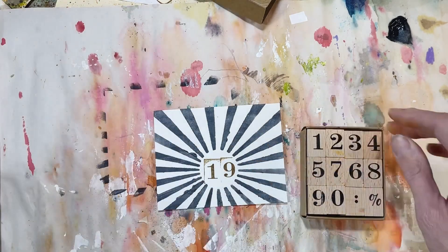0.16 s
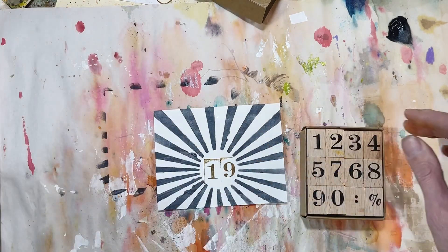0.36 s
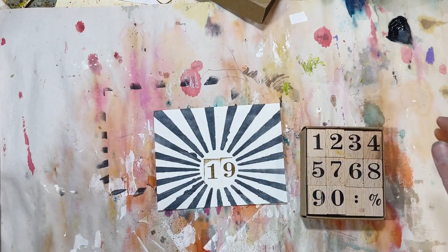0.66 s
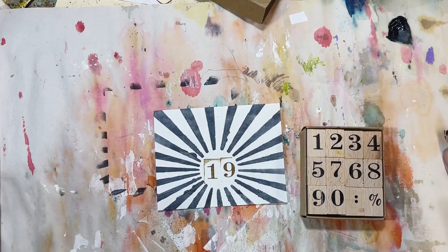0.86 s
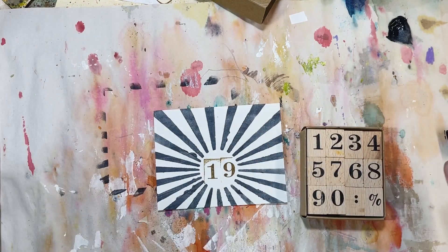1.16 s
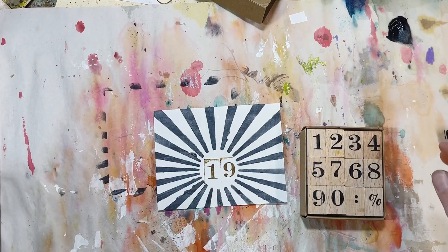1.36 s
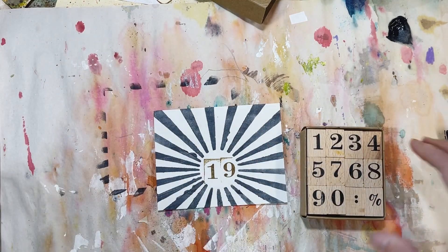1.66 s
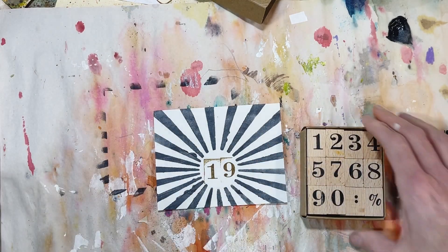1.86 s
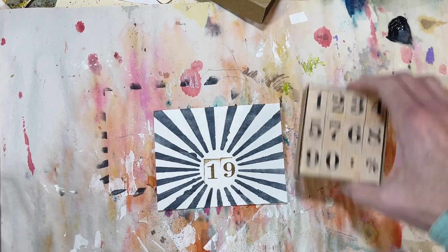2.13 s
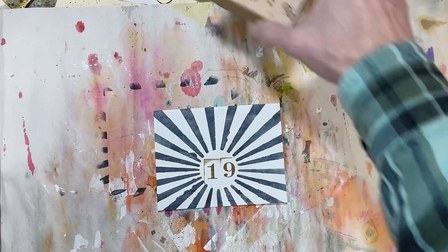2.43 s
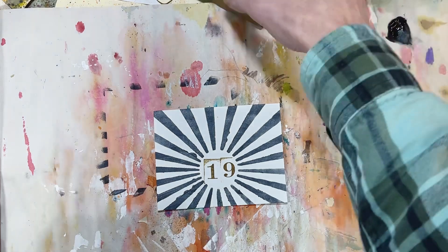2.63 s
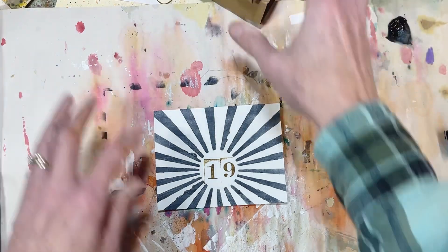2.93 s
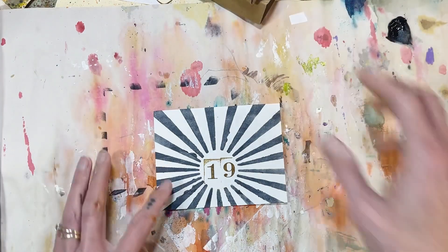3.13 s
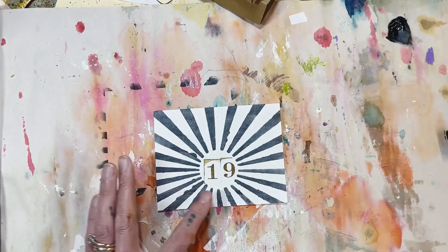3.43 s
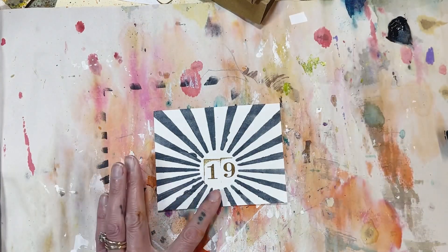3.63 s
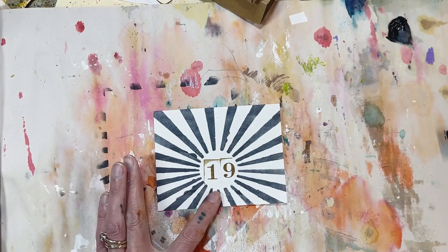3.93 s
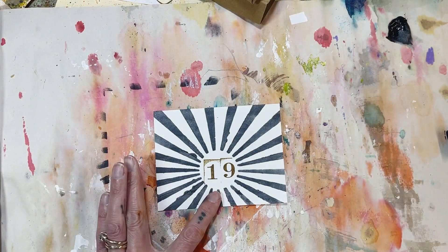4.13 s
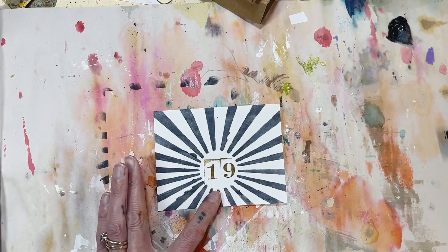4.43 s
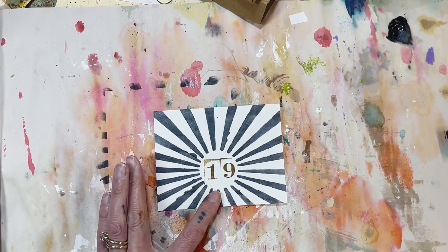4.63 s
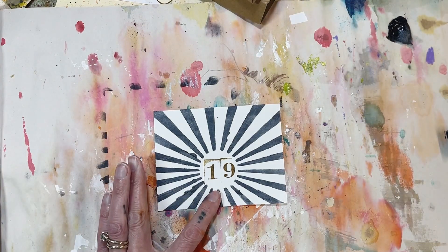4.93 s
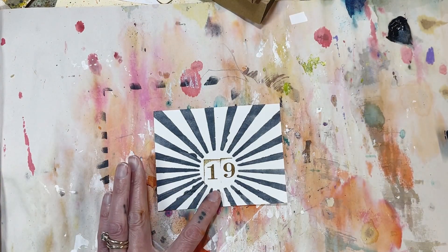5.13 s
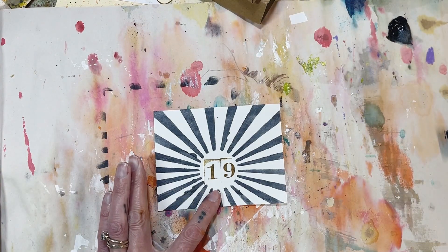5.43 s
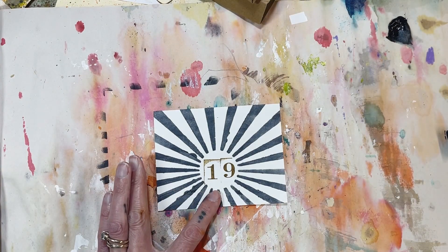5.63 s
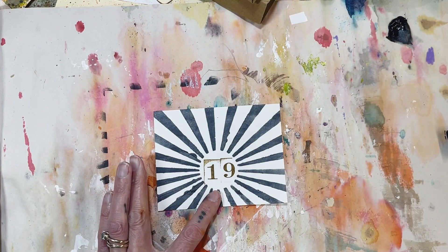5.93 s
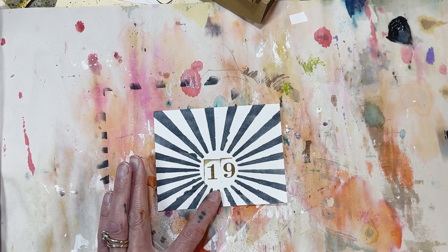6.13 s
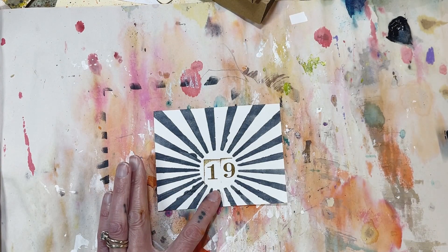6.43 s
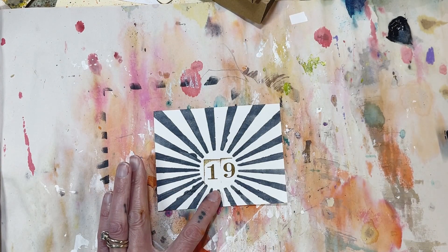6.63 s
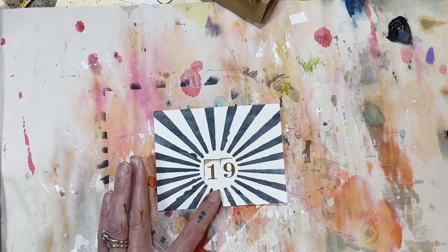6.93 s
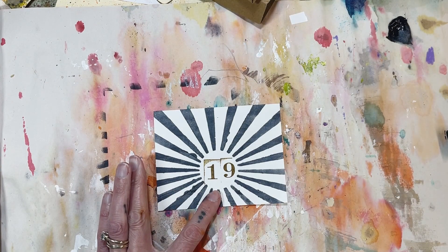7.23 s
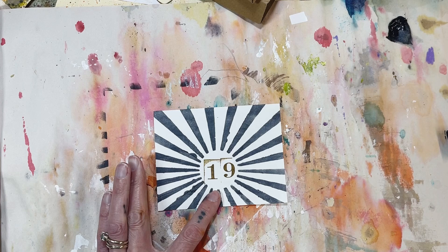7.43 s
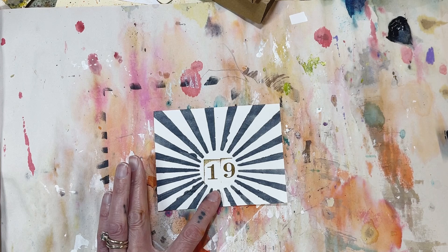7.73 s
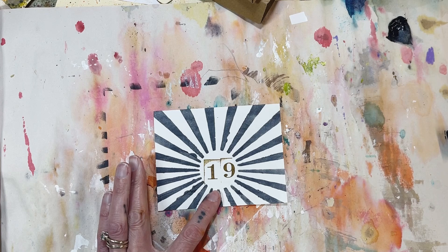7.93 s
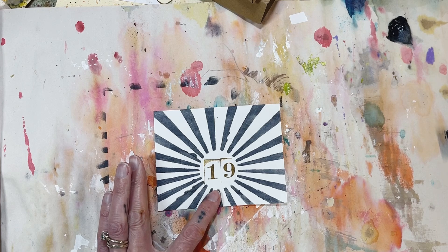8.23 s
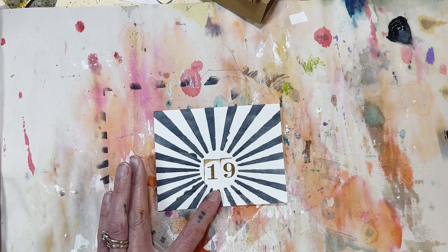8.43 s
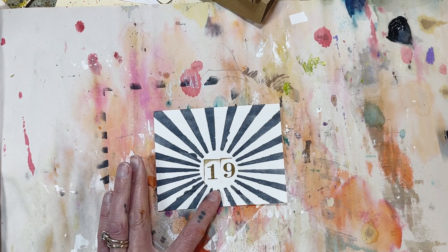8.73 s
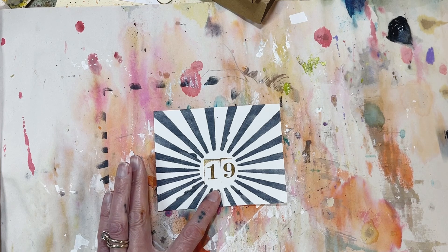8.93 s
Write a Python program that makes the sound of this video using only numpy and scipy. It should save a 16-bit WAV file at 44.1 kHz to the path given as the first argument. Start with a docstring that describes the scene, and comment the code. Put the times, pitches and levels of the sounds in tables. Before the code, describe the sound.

A fast clockwork-like ticking runs steadily in a quiet small room while wooden stamp blocks knock, scrape and click on a tabletop.

```python
"""Rubber stamps and a ticking mechanism

A box of wooden rubber stamps is lifted off a work table and set down; a hand then picks through the blocks.
Rough bursts of force ring wood, card edges and tabletop; trains of tiny slips make the dragging sounds.
A small clockwork-like mechanism ticks about 17 times a second, its pace wandering, in a quiet room.
"""
import sys
import numpy as np
from scipy import signal
from scipy.fft import rfft, irfft, next_fast_len
from scipy.io import wavfile
from scipy.ndimage import uniform_filter1d

SR = 44100
rng = np.random.default_rng(int(sys.argv[2]) if len(sys.argv) > 2 else 0)


def master_out(mix):
    """Clip the mix to full scale and print it as 16-bit PCM to the path in sys.argv[1]."""
    frames = np.transpose(np.atleast_2d(mix))
    ceiling = np.clip(frames, -1, 1)
    pcm = np.round(ceiling * 32767).astype(np.int16)
    wavfile.write(sys.argv[1], SR, pcm)


N = 400428  # length in samples


def amp(db):
    """Turn decibels into a plain multiplier."""
    return 10 ** (np.asarray(db) / 20)


def evened(x):
    """Scale a signal to an average (RMS) strength of 1."""
    return x / np.sqrt(np.mean(x ** 2) + 1e-20)


def read_curve(points, hz):
    """Read a curve between its points, along a logarithmic pitch axis."""
    f, value = np.transpose(points)
    return np.interp(np.log(hz + 1), np.log(f + 1), value)


def add(mix, start_s, sound):
    """Mix a sound in at its start time, cutting off what runs past the end."""
    part = mix[max(round(start_s * SR), 0):][:len(sound)]
    part += sound[:len(part)]


def body(colour, modes=(), size=16384):
    """How an object answers a tap, with energy 1: a broad colour with ringing resonances on it."""
    hz = abs(np.fft.fftfreq(size, 1 / SR))
    # a resonance of 0 dB or less adds nothing
    peaks = sum((amp(2 * max(db, 0)) - 1) / (1 + (2 * (hz - f) / width) ** 2) for f, width, db in modes)
    log_gain = np.log(amp(read_curve(colour, hz)) * np.sqrt(1 + peaks))
    # the Hilbert transform supplies the phase that lets nothing sound before the tap
    spectrum = np.exp(signal.hilbert(log_gain).conj())
    response = np.fft.ifft(spectrum).real[:size // 2]
    return response / np.linalg.norm(response)


def contact(decay, hold=0, rise=0.00061, size=3000):
    """Force of a rough contact, energy 1: it rises, chatters for a while and dies away (times in s)."""
    t = np.arange(size) / SR
    onset = 1 - np.exp(-t / max(rise, 1 / SR))
    shape = onset * np.exp(-np.maximum(t - hold, 0) / max(decay, 10 / SR))
    force = shape * rng.standard_normal(size)
    for _ in range(2):  # a blow holds all pitches about equally
        spectrum = rfft(force)
        flat = irfft(spectrum / (abs(spectrum) + 1e-12), size)
        force = flat * np.sqrt(shape)
    return force / np.linalg.norm(force)


def ring(force, response):
    """Let a force sound through the object it acts on."""
    return signal.oaconvolve(force, response)[:N]


def hardened(colour, db_per_octave, pivot_hz):
    """A harder contact tilts a colour towards the treble, within -9 to 6 dB per octave."""
    hz, db = np.transpose(colour)
    return np.column_stack([hz, db + np.clip(db_per_octave, -9, 6) * np.log2(hz / pivot_hz)])


def bending(response, lag):
    """Bending waves in the board: the bass travels slower (lag is the delay in s at 1 kHz)."""
    turns = 2 * lag * np.sqrt(1000 * np.fft.rfftfreq(len(response), 1 / SR))
    return irfft(rfft(response) * np.exp(-2j * np.pi * turns))


def slips(per_s, spread_db):
    """Friction as a dense train of tiny slips of uneven size."""
    size = amp(spread_db * np.minimum(rng.exponential(1, N), 4)) * rng.choice([-1, 1], N)
    return evened(size * (rng.random(N) < per_s / SR))


# colour of the still room: f/Hz, relative level/dB
AIR_COLOUR = [(20, -25), (60, 3.5), (150, -9.5), (300, -14), (600, -21), (2000, -10.5), (5000, -18),
              (10500, -17.5), (12000, -43), (14000, -58)]


def air(air_db=-68.0):
    """Faint steady hiss of the still room: coloured noise."""
    return amp(air_db) * ring(rng.standard_normal(N), body(AIR_COLOUR))


def hum(hum_db=-75, hz=147.0, waver=0.0044, start_s=1.7, length_s=1.9):
    """A faint low hum comes and goes once in the room, its pitch wavering slightly."""
    out, size = np.zeros(N), round(length_s * SR)
    wander = evened(uniform_filter1d(rng.standard_normal(size), size=6000))
    pitch = hz * (1 + waver * wander)
    tone = signal.windows.tukey(size, .25) * np.sin(2 * np.pi * np.cumsum(pitch) / SR)
    add(out, start_s, amp(hum_db) * evened(tone))
    return out


# the mechanism keeps an even pace from one mark to the next: t/s, beats counted so far
PACE_MARKS = [(0.027, 0), (0.278, 4), (0.355, 5), (0.83, 12), (0.955, 14), (1.217, 19), (1.768, 28),
              (1.848, 29), (2.354, 37), (2.667, 43), (3.212, 52), (3.283, 53), (3.465, 56), (3.946, 65),
              (4.709, 78), (5.399, 91), (5.808, 98), (5.905, 100), (6.41, 109), (6.736, 115), (7.301, 125),
              (8.168, 140), (8.439, 145), (9.053, 155)]
# resonances of its case: f/Hz, width/Hz, level above the broad colour/dB
CASE_MODES = [(901, 27, 14.5), (1154, 26.5, 19.5), (1512, 42, 24.5), (1704, 420, 11.5), (1944, 32, 20.5),
              (2078, 63, 19), (2288, 55, 16.5), (2388, 114, 10.5), (2769, 25, 14.5), (3346, 56, 12),
              (3830, 82, 12.5), (4030, 25.4, 16.5), (4733, 340, 14.5), (6203, 140, 11), (6790, 120, 11.5),
              (7466, 204, 9)]
# broad colours of the beats and of the thin pings: f/Hz, relative level/dB
BEAT_COLOUR = [(100, -2.5), (550, -15.5), (850, 0), (1500, -8), (2100, 1), (3000, -0.5), (4500, 1),
               (5300, -1.5), (6500, 3.5), (8200, 11), (10200, 11), (11000, 0.5), (12000, -32), (14000, -57)]
PING_COLOUR = [(300, -49), (1500, -52), (5300, -25), (6300, -1.5), (8000, 0), (9500, 9.5), (10400, 12),
               (11200, -15), (12300, -24), (14000, -57)]
# it strikes harder as it runs faster, and no two beats are quite equal
USUAL_BEAT_S, DB_PER_DOUBLED_PACE, UNEVEN_DB = 0.053, 6.5, 1.04
# its pawl drops with a thin ping this share of the way from each tick to the next tock
PAWL_SHARE = 0.58


def mechanism(tock_db=-15.5, tick_db=-15.0, ping_db=-21.0, alike=0.65):
    """A short tock and a longer tick in turn rattle the case, much alike each time; a ping follows every tick."""
    strokes = [lambda: contact(decay=0.0098, hold=0.003, rise=0.0021),
               lambda: contact(decay=0.0038, hold=0.0121, rise=0.00041)]
    usual = [stroke() for stroke in strokes]
    share = np.clip(alike, 0, 1)
    beats, pings = np.zeros((2, N))
    marks, counted = np.transpose(PACE_MARKS)
    times = np.interp(np.arange(counted[-1] + 1), counted, marks)
    gaps = np.append(np.diff(times), USUAL_BEAT_S)
    for k, (start, gap) in enumerate(zip(times, gaps)):
        is_tick = k % 2
        db = DB_PER_DOUBLED_PACE * np.log2(USUAL_BEAT_S / gap) + UNEVEN_DB * rng.standard_normal()
        rattle = np.sqrt(share) * usual[is_tick] + np.sqrt(1 - share) * strokes[is_tick]()
        add(beats, start, amp(db + (tock_db, tick_db)[is_tick]) * rattle)
        if is_tick:
            ping = contact(decay=0.0028, hold=0.00066)
            add(pings, start + PAWL_SHARE * gap, amp(db + ping_db) * ping)
    return ring(beats, body(BEAT_COLOUR, CASE_MODES)) + ring(pings, body(PING_COLOUR, CASE_MODES))


# soft pushes that set the tabletop booming: t/s, relative level/dB, f/Hz
THUMPS = [(0.413, -51, 144), (0.63, -48, 176.7), (1.214, -33, 144), (1.354, -33.5, 149), (1.589, -41, 182),
          (2.013, -48, 151), (2.171, -34.5, 118), (2.23, -37.5, 80.7), (2.607, -38.5, 71),
          (4.057, -46.5, 66), (4.779, -45, 88.8), (4.846, -42, 175), (5.562, -38, 128), (5.763, -36, 117),
          (6.136, -33.5, 140), (6.206, -42, 83), (6.404, -46, 74.5), (6.907, -38.5, 81.4),
          (7.274, -33, 64.6), (8.324, -39, 65), (8.679, -51.5, 75.4), (8.84, -40.5, 71.6),
          (9.039, -39.5, 85)]
# broad colour of the boom, also heard under the slides: f/Hz, relative level/dB
BOOM_COLOUR = [(20, -48), (45, -4.5), (70, -0.5), (130, 1), (220, -7), (450, -28), (1200, -64)]
# resonances of the tabletop and the blocks on it, also used by slides and knocks:
# f/Hz, width/Hz, level above the broad colour/dB
TABLE_MODES = [(67.9, 7.4, 9.5), (103, 4.8, 6), (132, 9.2, 4.5), (154, 22, -4.5), (252, 26, 6),
               (370, 23, 5), (440, 58, -3.5), (484, 33, 8.5), (560, 38, -5.5), (736, 105, 5),
               (857, 37, 5.5), (1106, 100, 6), (1226, 40, -6), (1280, 40, 7), (1370, 35, -4),
               (1535, 32, 7.5), (1640, 37, 5), (2090, 99, -4), (3620, 54, -11), (3800, 81, 11)]


def thumps(thump_db=22, note_db=8, note_width=0.36):
    """A slow push wakes mostly the low resonances of the table."""
    out = np.zeros(N)
    for start, db, hz in THUMPS:
        push = body(BOOM_COLOUR, [(hz, note_width * hz, note_db)], size=4096)
        add(out, start, amp(db + thump_db) * ring(contact(decay=0.0097, rise=0.0035), push))
    return ring(out, body([(20, 0), (16000, 0.016)], TABLE_MODES))


# strokes of fingers and blocks sliding: t of full pressure/s, time held/s,
# then relative level/dB of the table rumble, the wooden scrape and the dry scratch
STROKES = [(0.0, 0.007, -64, -60, -56), (0.08, 0.28, -69.5, -80.5, -82), (1.97, 0.038, -69, -73.5, -56.5),
           (2.14, 0.0073, -54, -58, -55.5), (2.25, 0.072, -57, -75, -66), (3.12, 0.44, -80, -77, -81),
           (4.17, 0.061, -63, -63, -54), (4.85, 0.067, -58.5, -53, -61), (5.01, 0.029, -59, -58.5, -59),
           (5.25, 0.24, -71.5, -69.5, -63), (5.44, 0.087, -66, -50.5, -54), (5.7, 0.1, -50.5, -48, -60),
           (6.15, 0.15, -65, -62.5, -62), (6.295, 0.039, -58.5, -63.5, -50.5),
           (6.39, 0.22, -64, -64.5, -53), (6.58, 0.1, -65, -71, -61), (6.82, 0.2, -64, -78, -64),
           (7.028, 0.18, -59, -60.5, -53), (7.275, 0.034, -50, -57, -42), (7.439, 0.074, -55.5, -57, -46),
           (8.286, 0.066, -57, -57.5, -45.5), (8.41, 0.069, -66.5, -71.5, -61.5),
           (8.7, 0.07, -66, -67, -58.5), (8.798, 0.069, -63, -60.5, -48),
           (9.019, 0.047, -56.5, -55.5, -53.5)]
# broad colours of scrape and scratch: f/Hz, relative level/dB
SCRAPE_COLOUR = [(100, -33.5), (280, 3), (550, -4.5), (900, -10.5), (1700, -7), (3500, -13), (8000, -50)]
SCRATCH_COLOUR = [(300, -29), (900, 2.5), (2000, 12), (4000, 10), (5500, 8), (8000, 7.5), (10300, 15.5),
                  (11400, 3.5), (12500, -41), (15000, -74)]
# hollow resonances of a block dragged over the table: f/Hz, width/Hz, level above the broad colour/dB
HOLLOW_MODES = [(234, 41, 8.5), (349, 25, 7.5), (496, 34, 12.5), (657, 49, 5.5), (763, 160, 11.5),
                (1360, 60, -1), (1760, 73, 4)]
# every stroke swells and fades at the same rates
SWELL_DB_PER_S, FADE_DB_PER_S = 235, 195


def slides(rumble_db=1, scrape_db=1, scratch_db=2, grip_db=4.5):
    """Sliding skin, card and wood scratch on top and rumble through the table; the grip comes and goes."""
    t = np.arange(0, N, 64) / SR  # coarse time steps are enough for slow pressure
    pressure = np.zeros((3, len(t)))
    for full, held, *levels_db in STROKES:
        swell_db = SWELL_DB_PER_S * (full - t)
        fade_db = FADE_DB_PER_S * (t - full - held)
        eased_db = np.maximum(swell_db, fade_db).clip(0)
        pressure = np.maximum(pressure, amp(levels_db)[:, None] * amp(-eased_db))
    pressure = [np.interp(np.arange(N) / SR, t, track) for track in pressure]
    wander = uniform_filter1d(uniform_filter1d(rng.standard_normal(N), size=400), size=300)
    grip = amp(grip_db * evened(wander))
    rumble = ring(pressure[0] * slips(2000, 1.06), body(BOOM_COLOUR, TABLE_MODES))
    scrape = ring(pressure[1] * grip * slips(1500, 3.9), body(SCRAPE_COLOUR, HOLLOW_MODES))
    scratch = ring(pressure[2] * grip * slips(3500, 3.2), body(SCRATCH_COLOUR))
    return amp(rumble_db) * rumble + amp(scrape_db) * scrape + amp(scratch_db) * scratch


def squeak(squeak_db=-40, start_s=8.843, hz=5780, waver=0.0028, size=1300):
    """A fingertip sticks and slips on a block: one thin, unsteady note."""
    out = np.zeros(N)
    pitch = hz * (1 + waver * evened(uniform_filter1d(rng.standard_normal(size), size=100)))
    note = np.hanning(size) * np.sin(2 * np.pi * np.cumsum(pitch) / SR)
    add(out, start_s, amp(squeak_db) * note)
    return out


# snaps of cardboard and block edges: t/s, relative level/dB, f/Hz, hardness/dB per octave
SNAPS = [(2.1598, -24, 1570, -11), (2.2427, -16.5, 3270, -6), (2.2524, -30, 1770, -9),
         (6.2233, -22.5, 3430, 0), (6.2443, -21.5, 4700, 0.5), (6.28, -29, 10200, 6),
         (6.326, -19.5, 10400, 5.5), (6.3624, -22.5, 2000, -0.5), (6.3811, -10.5, 11200, 4),
         (6.3838, -17, 10200, -4.5), (6.4025, -17.5, 4340, -5.5), (6.4125, -17, 4230, 1),
         (7.2624, -17, 2230, 3), (7.268, -18, 3590, 2), (7.28, -13, 11000, 6), (7.3818, -18, 8200, 6),
         (7.427, -22, 2030, 0), (7.442, -12.5, 10500, 4), (7.4574, -26, 3600, 8),
         (7.5033, -19.5, 2760, 2.5), (7.5316, -23.5, 2760, 2), (7.544, -25, 1630, 5),
         (8.2804, -28, 3400, -5), (8.324, -18.5, 3180, 0.5), (8.8332, -18.5, 7440, 5),
         (8.8457, -24, 5770, -4.5), (9.026, -20.5, 4300, 0)]
# broad colour of a snap: f/Hz, relative level/dB
SNAP_COLOUR = [(300, -22), (1000, -11), (2000, 3.5), (4500, 5.5), (7000, 5), (10500, 8.5), (12000, -9),
               (13000, -8), (14600, -41), (16000, -27)]
SNAP_DECAY_S = 0.0029  # how fast the contact of a snap dies away


def snaps(snap_db=10, note_db=9, note_width=0.2):
    """Edges catch and let go, each ringing briefly at its own pitch."""
    out = np.zeros(N)
    for start, db, hz, hardness in SNAPS:
        edge = body(hardened(SNAP_COLOUR, hardness, 4000), [(hz, note_width * hz, note_db)], size=2048)
        force = contact(SNAP_DECAY_S, hold=0.0005, rise=0.00061)
        add(out, start, amp(db + snap_db) * ring(force, edge))
    return out


# wood knocking on wood and table: t/s, relative ring level/dB, f of the struck block/Hz,
# relative crack level/dB, hardness before softening/dB per octave
KNOCKS = [(0.474, -40, 1220, -54, 2), (0.636, -45.5, 354, -62, -8), (1.21, -23, 1530, -43, -7.5),
          (1.218, -21.5, 436, -58, -4.5), (1.249, -39, 1400, -60, -5.5), (1.338, -15.5, 1480, -29, 1.5),
          (1.3534, -22.5, 1500, -20, 0), (1.3571, -15, 740, -24, -0.5), (1.574, -31, 607, -47, -2),
          (1.589, -27.5, 620, -43, 1), (1.741, -40, 1160, -58, -5), (2.009, -43, 231, -68, -0.5),
          (2.143, -30.5, 1610, -40, 2.5), (2.173, -33, 1640, -59, 4.5), (2.199, -47, 1470, -60, -3),
          (2.581, -37, 950, -57, 0), (2.602, -24, 1350, -26.5, -1), (4.776, -41, 282, -45, 0),
          (4.835, -28.5, 1470, -51, 0), (4.865, -29, 235, -42, 4), (4.891, -27, 1420, -54, -2.5),
          (5.561, -30, 340, -43, -3.5), (5.696, -22.5, 2350, -36.5, -4), (5.747, -17.5, 2170, -29, 2),
          (5.757, -24, 2200, -45, -8), (5.766, -26, 290, -57, 1), (5.776, -22.5, 2160, -36.5, -2),
          (5.801, -29, 458, -49, 3.5), (6.133, -30.5, 343, -41.5, -9), (6.204, -33.5, 470, -35, -5),
          (6.485, -26, 764, -39, 4.5), (6.889, -32, 750, -50, 1.5), (7.277, -31, 390, -24.5, 0),
          (7.305, -38, 258, -35.5, -7), (8.289, -41, 255, -31.5, -2), (9.006, -39.5, 540, -60, -4)]
# broad colours of the ringing wood and the crack: f/Hz, relative level/dB
WOOD_COLOUR = [(80, -28.5), (170, -6.5), (400, -3.5), (720, -3), (1000, -3), (1500, -4), (2300, -4),
               (3500, -11), (8000, -65)]
CRACK_COLOUR = [(500, 2), (1400, -12), (3500, 6.5), (5500, 5), (7500, 6.5), (10300, 10), (11500, -5),
                (13000, -36), (16000, -49)]
KNOCK_DECAY_S = 0.0042  # how fast the contact of a knock dies away


def knocks(wood_db=14.0, crack_db=22, note_db=8, note_width=0.23, softening_db=2.5):
    """A blow cracks at the contact, rings the block at its own note and spreads through the tabletop."""
    wood, crack = np.zeros((2, N))
    for start, ring_db, hz, high_db, hardness in KNOCKS:
        tilt = hardness + softening_db * np.log2(hz / 1000)  # low notes come from padded, flat blows
        block = body(hardened(WOOD_COLOUR, tilt, 700), [(hz, note_width * hz, note_db)], size=2048)
        force = contact(KNOCK_DECAY_S, hold=0.0029, rise=0.0012)
        add(wood, start, amp(ring_db + wood_db) * ring(force, block))
        add(crack, start, amp(high_db + crack_db) * contact(KNOCK_DECAY_S, rise=0.00019))
    tabletop = bending(body([(20, 0), (16000, 0)], TABLE_MODES), lag=.0007)
    return ring(wood, tabletop) + ring(crack, body(CRACK_COLOUR))


# time the room takes to fade by 60 dB: f/Hz, t/s
ROOM_T60 = [(80, 0.24), (300, 0.26), (1000, 0.17), (3000, 0.14), (10000, 0.079)]


def room(x, wet_db, apart_db=-9, build=0.0027):
    """Direct sound plus the short tail of a small room, partly shared by both ports (build-up in s)."""
    shared, left, right = rng.standard_normal((3, SR // 2))
    noise = shared + amp(apart_db) * np.array([left, right])
    hz, t, z = signal.stft(noise, SR, nperseg=256)
    z = z * amp(-60 * t / read_curve(ROOM_T60, hz)[:, None])  # each pitch fades at its own rate
    tail = signal.istft(z * (1 - np.exp(-t / build)), SR, nperseg=256)[1]
    tail = tail / np.linalg.norm(tail[0])
    return x + amp(wet_db) * signal.fftconvolve(x[None], tail, axes=1)[:, :N]


def rocked(pair, hz=820, width_hz=160):
    """Blows shake the microphone stand: around its resonance the two ports move in opposite senses."""
    b, a = signal.iirnotch(hz, hz / max(width_hz, 10), fs=SR)
    # twice the notched sound minus the sound keeps every level but flips the sign at the notch
    return np.array([pair[0], 2 * signal.lfilter(b, a, pair[1]) - pair[1]])


def scene():
    """Mix the quiet background, the mechanism, the handling and the blows, in stereo."""
    background = thumps() + hum() + air()
    ticking = room(mechanism(), wet_db=-11.5, apart_db=-1, build=0.0051)
    handling = room(snaps() + squeak() + slides(), wet_db=-9.0, apart_db=-4, build=0.0003)
    blows = rocked(room(knocks(), wet_db=-9, apart_db=-5.0, build=0.00088))
    return ticking + blows + handling + background


# the two microphone ports resonate differently: f/Hz, phase by which the left leads/radians
PORT_LEAD = [(0, 0), (1600, 0), (2600, .55), (3700, .6), (4400, 1.3), (4750, 2.3), (5050, 4.1), (5400, 5.9),
             (6000, 6.3), (7000, 7.5), (8500, 9.15), (9500, 9.65), (11000, 11.1), (11800, 12.57)]
EDGE_HZ = 16400  # upper band limit


def record(dry):
    """The ports shift the phase between the channels; then a filter takes away the highest treble."""
    size = next_fast_len(N + 4096)
    lead = np.interp(np.fft.rfftfreq(size, 1 / SR), *np.transpose(PORT_LEAD))
    shift = np.exp(-1j * np.outer([0, 1], lead))  # only the right channel is held back
    pair = irfft(rfft(dry, size) * shift, size)[:, :N]
    lowpass = signal.firwin(511, EDGE_HZ, window=("kaiser", 9), fs=SR)
    return signal.oaconvolve(pair, lowpass[None], "same")


dry = scene()
out = record(dry)
master_out(out)
```